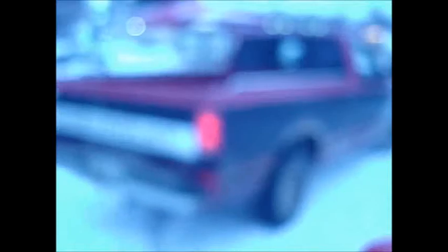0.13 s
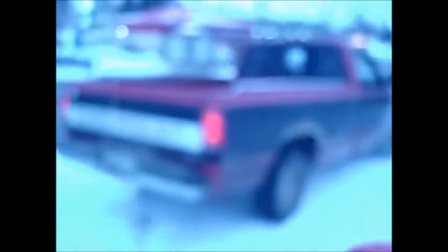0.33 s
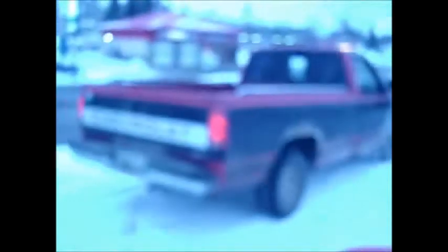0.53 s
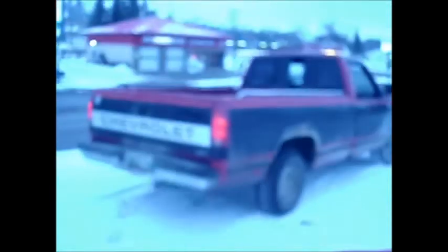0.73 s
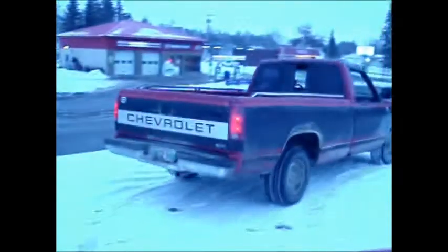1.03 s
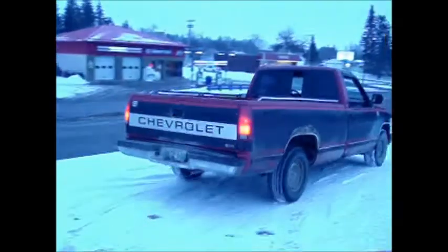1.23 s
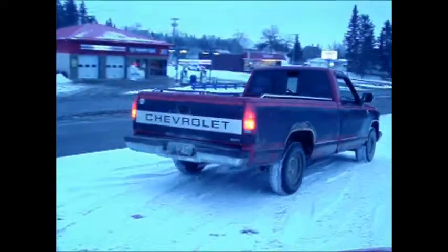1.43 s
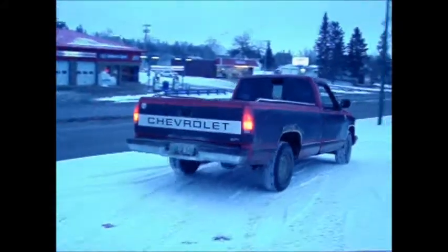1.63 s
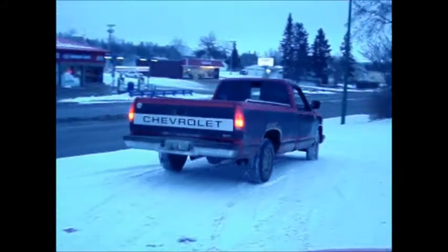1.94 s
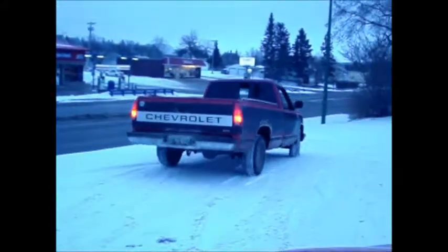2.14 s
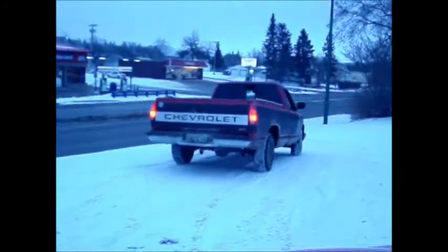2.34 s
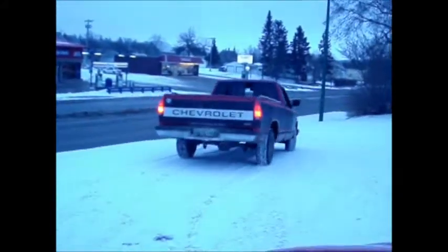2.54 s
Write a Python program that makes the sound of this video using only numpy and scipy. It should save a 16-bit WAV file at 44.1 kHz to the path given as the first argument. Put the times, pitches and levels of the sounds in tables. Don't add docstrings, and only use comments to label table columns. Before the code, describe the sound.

A pickup truck's loud exhaust starts abruptly at 0.08 s with a harsh, crackling double throttle blip until about 0.3 s. Revs fall with irregular hollow pops from 0.4 to 0.85 s, sinking to a low lumpy burble around 1.1-1.35 s. Throttle returns near 1.4 s: a raspy, throbbing eight-cylinder growl, strongest around 1.6 s, one sharp crack near 1.96 s, then duller and steadier as it draws away to 2.7 s. Faint street hush, short outdoor reflections, small close microphone.

```python
import sys
import numpy as np
from scipy import signal
from scipy.fft import rfft, irfft, next_fast_len
from scipy.io import wavfile
from scipy.ndimage import uniform_filter1d, minimum_filter1d, map_coordinates

SR = 44100
rng = np.random.default_rng(int(sys.argv[2]) if len(sys.argv) > 2 else 0)


def volts_from_decibels(level):
    exponent = np.asarray(level, float) / 20
    return 10 ** exponent


def transcribe(signal):
    frames = np.atleast_2d(signal).T
    limited = np.clip(frames, -1, 1)
    pcm = np.round(limited * 32767).astype(np.int16)
    wavfile.write(sys.argv[1], SR, pcm)


N = 119070

# t/s, throttle (sharpness of the blast) level/dB, load (weight of the pulse) level/dB
DRIVE = [(.08, -17, -44), (.18, -15.5, -34), (.195, -31.5, -42), (.21, -15, -39.5), (.28, -20, -32.5),
         (.33, -35.5, -40.5), (.5, -39, -34.5), (.7, -34.5, -35.5), (1.05, -43.5, -34), (1.36, -26.5, -31),
         (1.42, -21.5, -26.5), (1.62, -19.5, -25), (1.9, -23, -24.5), (2.05, -28.5, -27),
         (2.33, -29.5, -24), (2.7, -36.5, -26)]
# lateness/ms, boom level/dB, bark level/dB, rasp level/dB
CYLINDERS = [(0, -1, 0, 0), (0, -2, -11, -2), (1, -2, -13, -5), (-1, -1, -3, 0), (0, 0, -9, -3),
             (1.5, 2, -12, -7), (0, -2, -13, -8), (0, -2, -11, -8)]
# f/Hz, width/Hz, level/dB
TAILPIPE = [(662, 95, -0.5), (777.6, 83.5, 5), (950, 156, 0.5), (1182, 64, 0)]
# f/Hz, width/Hz, level/dB
BODY = [(1492, 109, -1.5), (2303, 298, -4), (2790, 550, -10), (3385, 365, -11), (3890, 740, -12),
        (6260, 1550, -22.5), (6900, 1600, -43.5)]


def unit(x):
    return x / np.sqrt(np.mean(x ** 2) + 1e-20)


def curves(rows):
    s, *columns = np.transpose(rows)
    return [np.interp(np.arange(N) / SR, s, column) for column in columns]


def wobble(rate):
    knots = rng.standard_normal(int(N * rate / SR) + 4)
    return map_coordinates(knots, [np.arange(N) * rate / SR])


def filtered(x, response):
    m = next_fast_len(N + SR // 2)
    return irfft(rfft(x, m) * response(np.fft.rfftfreq(m, 1 / SR)), m)[..., :N]


def resonant(x, modes):
    def response(f):
        total = 0
        for k, (centre, width, db) in enumerate(modes):
            damping = 1j * f * width
            total = total + (-1) ** k * volts_from_decibels(db) * damping / (centre ** 2 - f ** 2 + damping)
        return total
    return filtered(x, response)


def dip(x, hz, width_hz, depth):
    return filtered(x, lambda f: 1 - np.clip(depth, 0, 1) * np.exp(-((f - hz) / width_hz * 2) ** 2))


def train(s, gain):
    return np.bincount(np.clip(np.round(s * SR).astype(int), 0, N - 1), gain, N)


def puffs(pulses, ms):
    u = np.arange(-SR // 50, SR // 50) / SR / (ms / 1000)
    return signal.fftconvolve(pulses, np.exp(-u * u / 2), "same") * rng.standard_normal(N)


def snap(pulses):
    snap_hz = 1900
    u = np.arange(200) / SR * 2 * np.pi * snap_hz
    return -signal.fftconvolve(pulses, (1 - u / 2) * u * np.exp(1 - u))[:N]


def crank():
    # t/s, firing rate f/Hz
    speed = [(0.08, 92), (0.3, 109), (0.45, 100), (0.55, 84), (0.7, 70), (0.88, 58), (1.05, 51.9),
             (1.2, 50.5), (1.34, 46.5), (1.46, 51.6), (1.62, 58.0), (1.8, 59.4), (2.1, 60.2), (2.4, 58.3),
             (2.7, 56.9)]
    first_fires_s = 1.699
    turns = np.cumsum(curves(speed)[0]) / SR
    return turns - turns[round(first_fires_s * SR)]


def firings():
    turns = crank()
    k = np.arange(np.ceil(turns[0]), turns[-1])
    return np.interp(k, turns, np.arange(N) / SR), k.astype(int) % len(CYLINDERS)


def rasp(s, rasp_db):
    tint_db, burst_ms = 3.3, 1.8
    total = 0
    for hz, width, db in BODY:
        tint = tint_db * rng.standard_normal(len(s))
        burst = puffs(train(s, volts_from_decibels(rasp_db + db / 2 + tint)), burst_ms)
        ring = resonant(burst, [(hz, 2 * width, db / 2)])
        total = total + resonant(ring, [(hz, 2 * width, 0)])
    return unit(total)


def bark(s, bark_db):
    lead_s, burst_ms, noise = .0052, 1.6, .3
    blows = train(s - lead_s, volts_from_decibels(bark_db))
    tone = unit(resonant(resonant(blows, TAILPIPE), TAILPIPE))
    breath = unit(resonant(puffs(blows, burst_ms), TAILPIPE))
    return unit(tone + noise * breath)


def wash():
    top_hz = 3000
    flow = resonant(rng.standard_normal(N), TAILPIPE + BODY)
    return unit(filtered(flow, lambda hz: 1 / (1 + (hz / top_hz) ** 4)))


def roar():
    # f/Hz, width/Hz, level/dB
    mouth = [(787, 140, -5), (1413, 85, -1.5), (2233, 93, 5.5), (2810, 87, -3), (3200, 230, -12),
             (6200, 2350, -17.5), (7460, 790, -16)]
    lump_db = 3.5
    jet = rng.standard_normal(N) * volts_from_decibels(lump_db * wobble(150))
    return unit(resonant(jet, [(hz, width + 150, db) for hz, width, db in mouth]))


def blast():
    jitter_ms, scatter_db = .6, 1.2
    over, load = np.add(curves(DRIVE), 25)
    s, cyl = firings()
    late, _, bark_db, rasp_db = np.transpose(CYLINDERS)[:, cyl]
    jitter, bark_luck, rasp_luck, spit_luck = rng.standard_normal((4, len(s)))
    s = s + (late + jitter_ms * jitter) / 1000
    barks = bark(s, bark_db + scatter_db * bark_luck)
    rasps = rasp(s, rasp_db + scatter_db * rasp_luck)
    spits = unit(snap(train(s, volts_from_decibels(scatter_db * spit_luck))))
    total = volts_from_decibels(.85 * over) * rasps
    total += volts_from_decibels(1 + .65 * over + .55 * load) * barks
    total += volts_from_decibels(-18 + 1.8 * over) * spits
    total += volts_from_decibels(-9 + .71 * over) * wash()
    total += volts_from_decibels(-17 + 1.1 * over + .9 * (over - load)) * roar()
    return volts_from_decibels(-27) * total


def boom():
    bank = [1, -1, -1, 1, -1, 1, 1, -1]
    # f/Hz, width/Hz, level/dB
    shared = [(57, 35, -2.5), (115.8, 26.7, -1.5), (173.2, 21.5, 2), (242, 35.5, -13), (317, 26.4, -10.5)]
    # f/Hz, width/Hz, level/dB
    mismatch = [(87.5, 22, -1.5), (169, 56, -6), (216.8, 33.5, 2), (262.5, 47, 0), (303.8, 19.8, -1.5)]
    # multiple of the firing rate, level/dB, growth with throttle over load
    drones = [(1.5, -13, .5), (2.5, -17, .7)]
    lead_s, scatter_db, mismatch_db, rumble_db = .007, .8, -1.5, -12
    throttle_db, load_db = curves(DRIVE)
    s, cyl = firings()
    late, boom_db = np.transpose(CYLINDERS)[:2, cyl]
    push = volts_from_decibels(boom_db + scatter_db * rng.standard_normal(len(s)))
    s = s - lead_s + late / 1000
    total = unit(resonant(train(s, push), shared))
    total += volts_from_decibels(mismatch_db) * unit(resonant(train(s, push * np.take(bank, cyl)), mismatch))
    turns = crank()
    for order, db, grows in drones:
        level_db = db + grows * (throttle_db - load_db) + wobble(4)
        total += volts_from_decibels(level_db) * np.sin(2 * np.pi * order * turns)
    total += volts_from_decibels(rumble_db) * unit(resonant(rng.standard_normal(N), mismatch))
    return volts_from_decibels(load_db) * total


def street():
    # f/Hz, level/dB (per Hz)
    hush = [(45, -38), (252, -6), (781, -5), (1300, -16), (1800, -13), (3370, -30), (6000, -43),
            (10000, -51)]
    f, db = np.transpose(hush)
    noise = rng.standard_normal(N)
    shaped = filtered(noise, lambda hz: volts_from_decibels(np.interp(np.log(hz + 1), np.log(f), db)))
    return volts_from_decibels(-28.5) * unit(shaped)


def yard(x):
    t60_s, gap_s = 0.1, .004
    t = np.arange(SR // 3) / SR
    tail = rng.standard_normal(len(t)) * volts_from_decibels(-60 * t / t60_s) * (t > gap_s)
    return signal.fftconvolve(x, tail / np.linalg.norm(tail))[:N]


def backfires():
    # t/s, peak level/dB
    pop_times = [(0.401, -7), (0.411, -13), (0.42, -10), (0.439, -12), (0.55, -12), (0.585, -13),
                 (0.597, -10), (0.627, -4), (0.648, -15), (0.662, -2), (0.682, -13), (0.717, -12),
                 (0.752, -18), (0.859, -18)]
    # t/s, peak level/dB
    snap_times = [(.091, -1), (.1673, -1), (.1838, -1), (.2147, -2), (.2263, 0), (.2341, -3), (.2757, -3),
                  (.2832, -3), (1.9602, 1)]
    # f/Hz, width/Hz, level/dB
    pop_ring = [(296, 146, -3.5), (700, 204, 4.5), (1084, 1070, -5.5), (1940, 230, -3.5)]
    pop_db, puff_db, puff_ms, snap_db = -1.5, -5, 1.4, 5.5
    s, db = np.transpose(pop_times)
    blows = train(s + 0.00106, volts_from_decibels(db + pop_db))
    peak = np.abs(resonant(np.arange(N) == 0, pop_ring)).max()
    pops = resonant(blows + volts_from_decibels(puff_db) * puffs(blows, puff_ms) / 5, pop_ring) / peak
    pops = filtered(pops, lambda hz: 1 / (1 + (hz / 5000) ** 2))
    s, db = np.transpose(snap_times)
    return pops + snap(train(s, volts_from_decibels(db + snap_db)))


def scene():
    bright = blast()
    far = np.interp(np.arange(N) / SR, (1.92, 2.1), [0, 1])
    bright = (1 - far) * bright + far * dip(bright, 2300, 1300, .55)
    bright = bright + backfires()
    heard = boom() + bright + volts_from_decibels(-9.5) * yard(bright) + street()
    return dip(heard, 440, 220, .62)[None]


def gated(x):
    under_db, above_hz = -9, 4500
    hz, _, z = signal.stft(x, SR, nperseg=256)
    power = uniform_filter1d(np.abs(z) ** 2, size=6, axis=1)
    power = uniform_filter1d(power, size=2, axis=2)
    recent = -minimum_filter1d(-power, size=11, axis=2)
    drop = (power < recent * volts_from_decibels(2 * under_db)) & (hz[:, None] > above_hz)
    return signal.istft(np.where(drop, 0.021 * z, z), SR, nperseg=256)[1][:, :N]


def top_cut(x):
    return signal.sosfilt(signal.butter(12, 10190, fs=SR, output="sos"), x)


def record(dry):
    low_hz, clip, start_s, top_hz = 48, 1.02, .0785, 10100
    x = filtered(dry, lambda f: (1j * f / (low_hz + 1j * f)) ** 3)
    x = gated(x / (1 + np.abs(x / clip) ** 6) ** (1 / 6))
    x = x * np.clip((np.arange(N) / SR - start_s) / 0.0044, 3e-4, 1)
    x = filtered(x, lambda f: 1 / (1 + (f / 9200) ** 12) * (f < top_hz))
    return top_cut(x)


dry = scene()
out = record(dry)
transcribe(out)
```